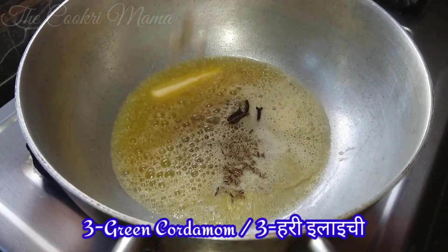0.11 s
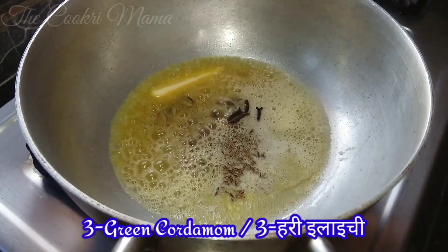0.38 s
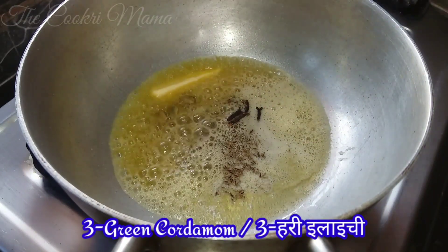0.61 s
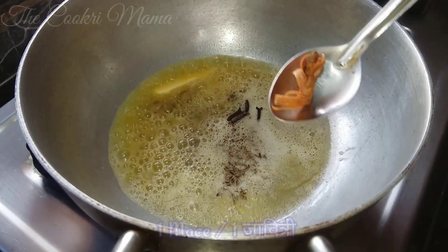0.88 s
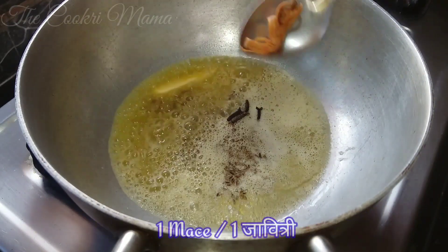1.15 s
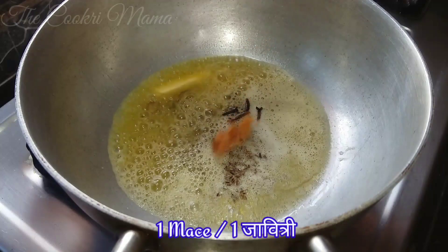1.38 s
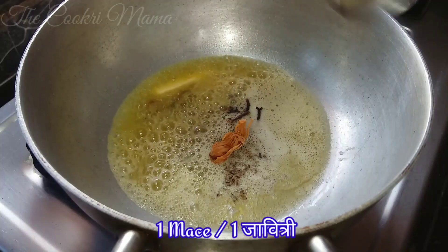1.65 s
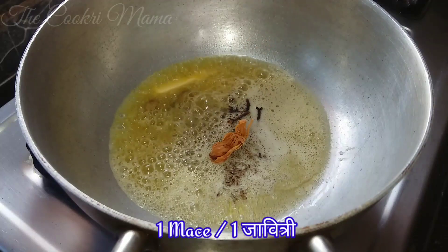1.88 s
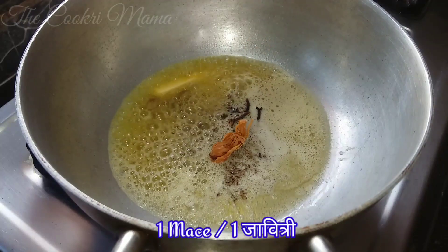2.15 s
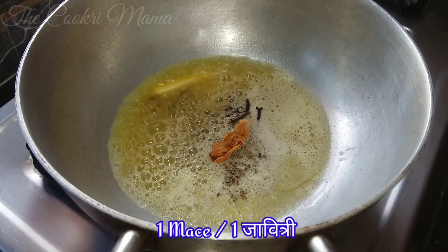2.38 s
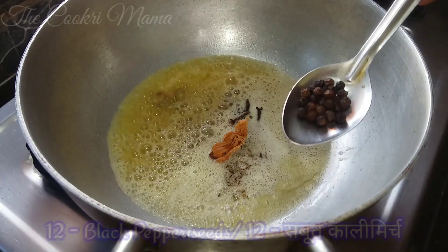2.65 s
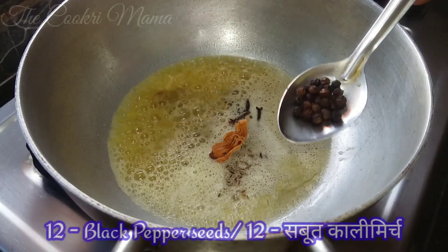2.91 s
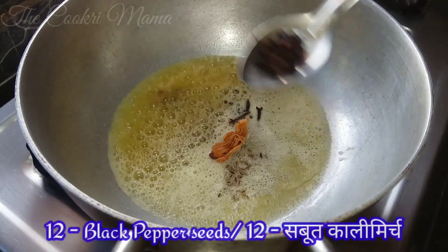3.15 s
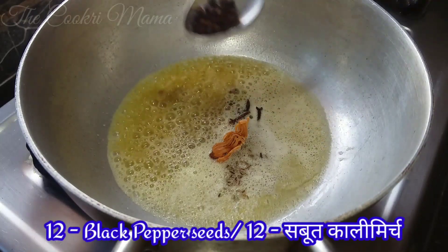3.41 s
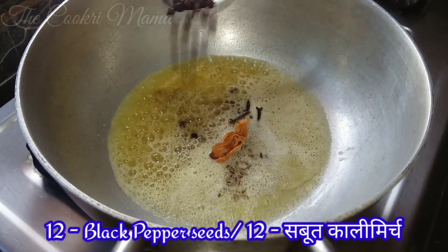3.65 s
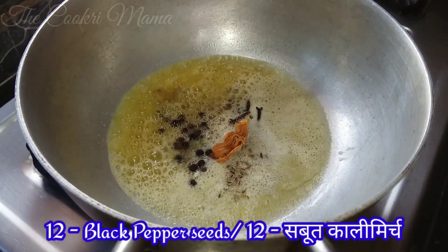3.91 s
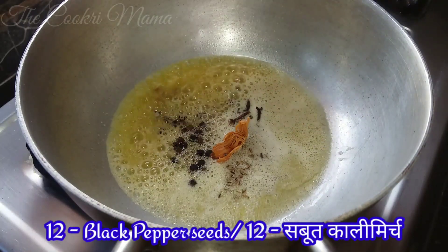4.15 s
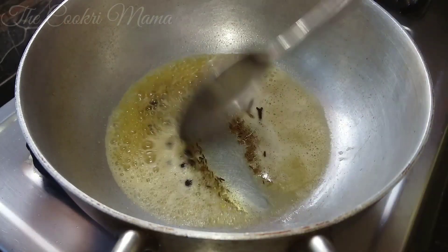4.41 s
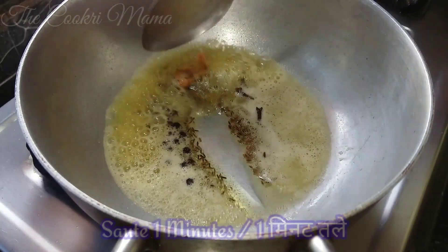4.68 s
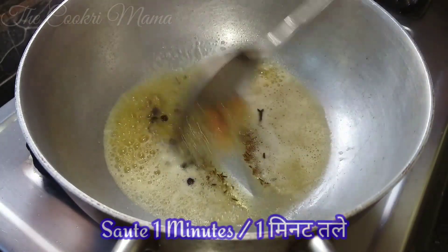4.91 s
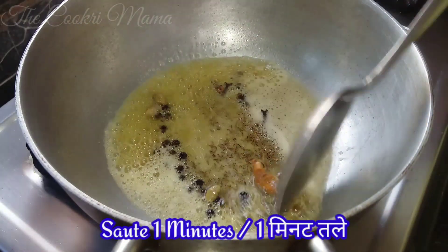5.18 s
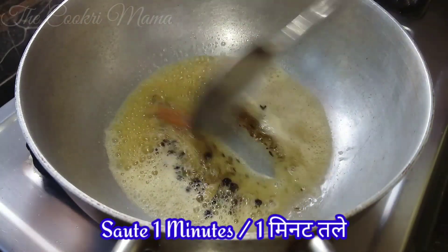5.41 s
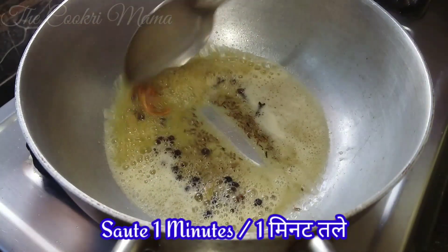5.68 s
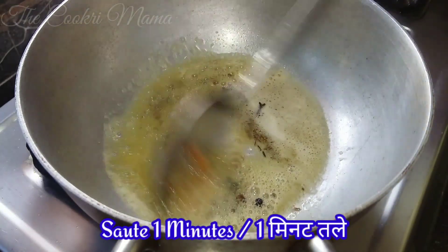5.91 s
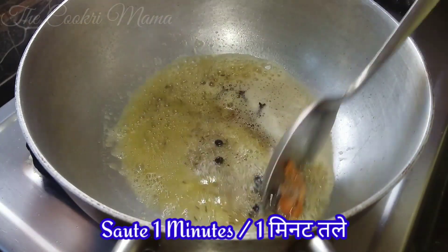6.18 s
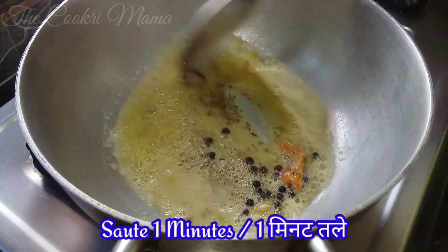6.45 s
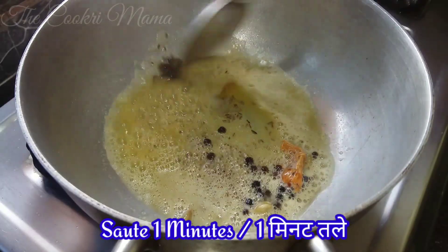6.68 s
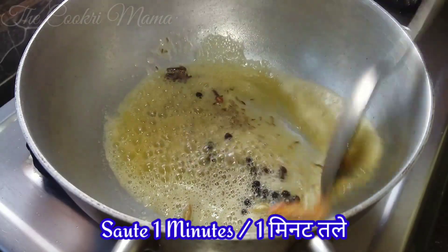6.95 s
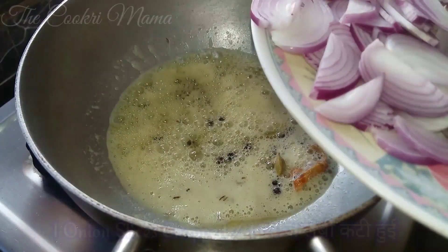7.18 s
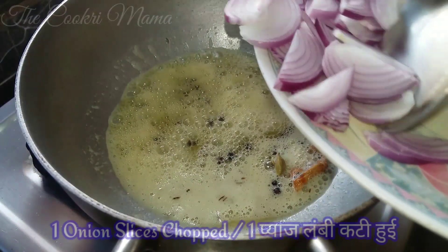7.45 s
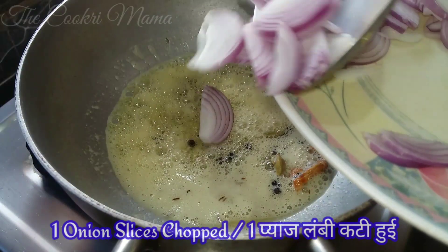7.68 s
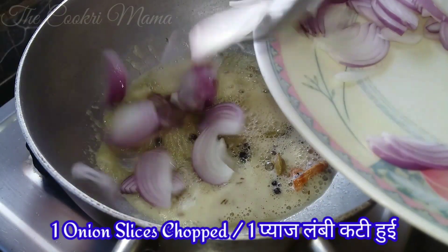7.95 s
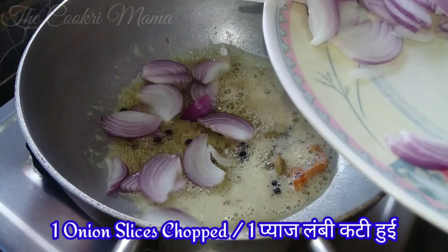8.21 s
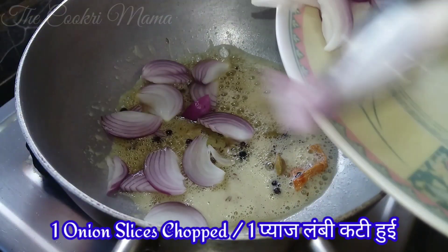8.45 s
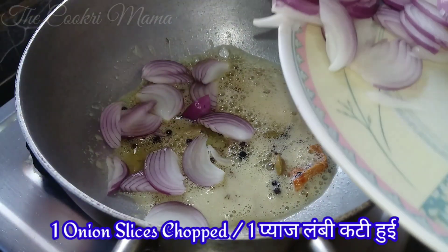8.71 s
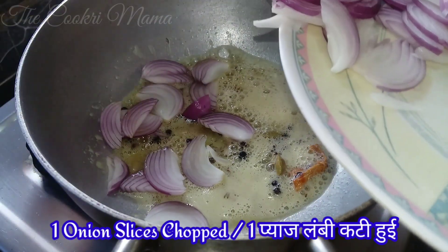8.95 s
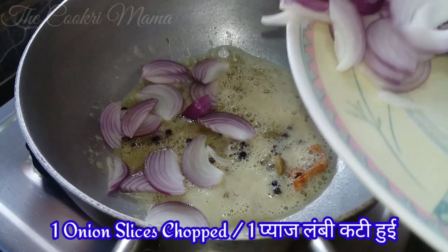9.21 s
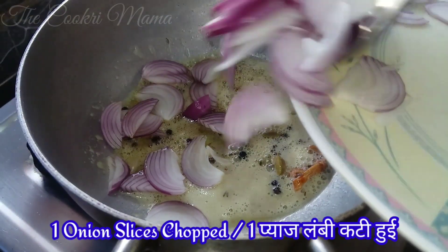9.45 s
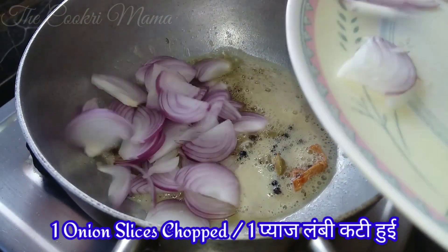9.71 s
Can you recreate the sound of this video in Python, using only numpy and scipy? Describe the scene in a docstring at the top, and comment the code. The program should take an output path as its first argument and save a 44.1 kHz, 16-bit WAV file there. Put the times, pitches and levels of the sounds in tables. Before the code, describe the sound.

Butter sizzles densely in a metal pan, a steel spoon knocks and scrapes, then the frying drops away and wet onion slices spit sharply.

```python
"""In a kitchen, butter foams and fries spices in a deep metal pan, close by and to the left of two microphones.
Bursting bubbles make the sizzle, and louder single bubbles the spits. A steel spoon stirs, and its knocks and
scrapes set the pan ringing. Near 7.3 s the frying drops abruptly to a much lower level; after that the spoon pushes
onion slices off a ringing plate, and they spit in the fat. Scraped edges sing as gliding tones. A motor hums in
steady lines, and filtered noise is the rumbling air."""
import sys
import numpy as np
from scipy import signal
from scipy.fft import rfft, irfft, next_fast_len
from scipy.io import wavfile

SR = 44100
rng = np.random.default_rng(int(sys.argv[2]) if len(sys.argv) > 2 else 0)


def wav_record(signal):
    """Record a signal, one row per channel, as 16-bit PCM in the file named by sys.argv[1]."""
    frames = np.transpose(np.atleast_2d(signal))
    bounded = np.clip(frames, -1, 1)
    # unit amplitude maps onto the largest positive 16-bit level
    quanta = np.round(bounded * 32767).astype(np.int16)
    wavfile.write(sys.argv[1], SR, quanta)


def voltage_ratio(level):
    """Linear amplitude factor for a level in decibels (scalar or array-like)."""
    return 10 ** (np.asarray(level, float) / 20)


N = 433944   # length [samples]
SIZE = next_fast_len(N + SR)   # transform length [samples], with room for filter tails
HZ = np.maximum(np.arange(SIZE // 2 + 1) * SR / SIZE, 1)   # frequency of each transform bin


def rms_one(x):
    """Scale to rms 1."""
    return x / np.sqrt(np.mean(x ** 2) + 1e-20)


def in_time(rows):
    """Read the columns of a time table at every sample."""
    s, *columns = np.transpose(rows)
    return [np.interp(np.arange(N) / SR, s, column) for column in columns]


def at_hz(points, hz):
    """Read a table of frequencies on a log-frequency axis."""
    table_hz, values = np.transpose(points)
    return np.interp(np.log(hz), np.log(table_hz), values)


def coloured(x, db):
    """Minimum-phase filter with the given dB per bin: nothing sounds before its cause."""
    cepstrum = irfft(db * np.log(10) / 20, SIZE)
    # folding the second half onto the first makes the filter act only forward in time
    cepstrum[..., 1:SIZE // 2] *= 2
    cepstrum[..., SIZE // 2 + 1:] = 0
    response = np.exp(rfft(cepstrum))
    return irfft(rfft(x, SIZE) * response, SIZE)[..., :N]


def drift(rate):
    """Smooth random wandering of spread 1: noise through two equal low-passes with corner rate [Hz]."""
    r = np.exp(-80 * np.pi * rate / SR)   # computed at every 40th sample only
    noise = rng.standard_normal(N // 40 + 2002)
    slow = signal.lfilter([1], [1, -2 * r, r * r], noise)[2000:]
    return np.interp(np.arange(N) / 40, np.arange(len(slow)), rms_one(slow - slow.mean()))


def ring(clicks, hz, t60):
    """A unit click sets a cosine of height 1 ringing, with no push of still air behind it."""
    r, w = voltage_ratio(-60 / (t60 * SR)), 2 * np.pi * hz / SR
    return signal.lfilter([.5, 0, -.5], [1, -2 * r * np.cos(w), r * r], clicks + 1e-18)


def ring_softly(force, hz, t60):
    """A blunt contact sets a sine of height 1 ringing: it starts from rest, without a bright click."""
    r, w = voltage_ratio(-60 / (t60 * SR)), 2 * np.pi * hz / SR
    return signal.lfilter([0, np.sin(w)], [1, -2 * r * np.cos(w), r * r], force + 1e-18)


def echo_tails(shape, t60, gap_s):
    """Diffuse reflections of unit energy: fading noise, different for each microphone and place."""
    t = np.arange(shape[-1]) / SR
    tail = rng.standard_normal(shape) * voltage_ratio(-60 * t / t60) * (t > gap_s)
    return tail / np.sqrt(np.sum(tail ** 2, axis=-1, keepdims=True))


def echoes(x, t60, gap_s):
    """One source thrown back to both microphones."""
    return signal.oaconvolve(x[None], echo_tails((2, SR // 2), t60, gap_s), axes=1)[:, :N]


def panned(db):
    """Left and right gains for a level difference, left minus right."""
    return voltage_ratio(np.array([db, -db]) / 2)


def sizzle():
    """Steam bubbles burst in clumps all over the pan and ring a few cycles, over the fine fizz of the foam."""
    # state of the fat: (time [s], extra gain of the top treble [dB], left minus right [dB],
    # bursts before clumping [per s])
    fat = [(0, 2, 1, 2140), (3.7, 1, 2, 2480), (4.76, 0.5, 0.5, 3300), (4.82, 3, 0.5, 3600),
           (5.4, 4, -0.5, 3500), (6.4, 5.5, 0.5, 5400), (7.31, 4.5, 0.5, 5500), (7.33, 4, 3, 500),
           (8.02, 5, -1, 710), (8.1, 12, 3.5, 2500), (8.5, 7.5, 0.5, 1000), (9.84, 8.5, 2.5, 1200)]
    # colouring filter of the frying: (frequency [Hz], gain [dB])
    sizzle_colour = [(400, -37), (600, -22), (900, -15), (1100, -19.5), (1430, -8.5), (1800, -10),
                     (2100, -6.5), (2700, -3.5), (3120, -1.5), (3400, 1), (3900, 1), (5000, 2.5),
                     (6400, -3.5), (8000, -11.5), (12000, -23.5), (15600, -29)]
    # left louder than right, before the shares given below: (frequency [Hz], difference [dB])
    shadow = [(500, 7), (1290, -2.5), (2400, 2.5), (3300, 4.5), (4400, 11), (5500, 12), (7000, 5),
              (15000, 7.5)]
    level_db = frying_db()
    treble_db, pan_db, per_s = in_time(fat)

    clumps = voltage_ratio(1.5 * drift(25.0) + 0.31 * drift(8.0) + 1.5 * drift(70.0))
    sizes = voltage_ratio(2.16 * np.minimum(rng.exponential(1, N), 5)) * rng.choice([-1, 1], N)
    born = sizes * (rng.random(N) < per_s * clumps / SR) / np.sqrt(per_s)

    # 36 places, each with its own bubble pitch and its own way round the bowl
    pitches, dealt = np.geomspace(600, 15000, 36), rng.integers(0, 36, N)
    paths = echo_tails((36, 2, 2048), t60=0.11, gap_s=0.00067) * voltage_ratio([[-5.0], [-1.5]])
    paths[:, 0, 0] += voltage_ratio(0.5)   # direct sound on the left
    # the right microphone is 6-10 samples further off
    paths[np.arange(36), 1, rng.integers(6, 11, 36)] += voltage_ratio(-7.5)
    bursts = np.zeros((2, N))
    for k, hz in enumerate(pitches):
        bubble = hz ** 0.7 * ring(paths[k], hz, 12.0 / hz)
        bursts += signal.oaconvolve((born * (dealt == k))[None], bubble, axes=1)[:, :N]

    tilt_db = 2.2 * np.log2(HZ / 5000)
    fizz = coloured(rng.standard_normal((2, N)), tilt_db) * clumps ** 0.039
    shade = at_hz(shadow, HZ)
    colour_db = at_hz(sizzle_colour, HZ) + np.array([0.25 * shade, -.7 * shade])
    both = rms_one(coloured(rms_one(bursts) + voltage_ratio(-2.0) * fizz, colour_db))
    top = signal.sosfilt(signal.butter(2, 7000, "high", fs=SR, output="sos"), both)
    top_gain = voltage_ratio(treble_db + 0.77 * drift(10.0))
    return voltage_ratio(level_db) * (both + (top_gain - 1) * top) * panned(pan_db)


def frying_db():
    """The slow level of the frying, wavering, with brief flares added as power."""
    # the frying swells as spices go in, drops abruptly near 7.3 s, and rises with the first onions:
    # (time [s], level before wavering and flares [dB])
    fry = [(0, -25), (0.1, -23), (0.28, -24), (0.7, -24), (1.07, -22.5), (1.4, -22), (2.44, -23),
           (2.58, -21.5), (3.6, -21), (4.5, -20.5), (5.1, -19.5), (5.55, -17.5), (5.8, -19), (6.44, -18.5),
           (7.285, -21), (7.32, -33), (7.327, -48.5), (8.06, -42), (8.11, -31), (8.45, -32.5),
           (8.55, -36.5), (9.84, -39.5)]
    # brief flares of the sizzle where wet onion meets the fat: (time [s], peak level [dB])
    flares = [(7.54, -47), (7.66, -49), (7.75, -36), (7.91, -38), (8.61, -29.5), (8.69, -36), (8.8, -37),
              (9.15, -34), (9.5, -42), (9.62, -34), (9.7, -49), (9.76, -29), (9.84, -30)]
    rise_db_per_s, fall_db_per_s = 404, 306
    t = np.arange(N) / SR
    power = voltage_ratio(2 * (in_time(fry)[0] - 0.31 * drift(0.56)))
    for s, db in flares:
        below_peak_db = np.maximum(rise_db_per_s * (s - t), fall_db_per_s * (t - s))
        power = power + voltage_ratio(2 * (db - below_peak_db))
    return 10 * np.log10(power)


def spits():
    """Each spit is a bubble ringing at its own pitch with a bright crack; the right microphone hears it later."""
    # spits of water in the fat, some loud and many quiet, before filtering and echoes: # (time [s], level [dB],
    # pitch [Hz], left minus right [dB])
    listed_spits = [(0.4085, -11, 4790, 13), (0.5302, -16, 4840, 8), (0.6659, -11, 3420, 12),
                    (0.9345, -9, 2540, 10), (0.9895, -11.5, 2600, 13), (1.1837, -19, 4560, 8),
                    (1.3029, -11, 4950, 8), (1.4182, -14, 5120, 6), (1.8642, -14, 5100, 20),
                    (2.0737, -14, 3530, 6), (2.1605, -12, 2860, 17), (2.7501, -21, 4550, 8),
                    (3.3682, -19, 5070, 6), (3.4301, -14, 3390, 10), (3.6137, -6, 4040, 12),
                    (3.6865, -13, 4850, 10.5), (4.4842, -19, 3320, 3), (5.0574, -9, 3550, 12),
                    (5.0948, -16, 4450, 6), (5.1307, -18, 4730, 5), (7.342, -31, 7500, 10),
                    (7.348, -31, 4500, 10), (7.368, -34, 8000, 10), (7.385, -36, 5000, 10),
                    (7.4032, -33, 4160, 11), (7.409, -29, 7000, 10), (7.4371, -30, 3640, 10),
                    (7.467, -33, 4500, 10), (7.4915, -27, 5000, 8), (7.5274, -26, 4240, 11),
                    (7.534, -26, 7200, 12), (7.5763, -34, 5200, 10), (7.6182, -33, 5000, 10),
                    (7.637, -31, 6000, 10), (7.6551, -30, 4700, 8), (7.6626, -28, 4900, 11),
                    (7.678, -31, 6000, 10), (7.706, -31, 8000, 10), (7.726, -13.5, 6600, 7),
                    (7.7843, -29, 5500, 11), (7.7982, -25, 4700, 10), (7.9459, -32, 5860, 10),
                    (8.0093, -24.5, 4260, 17), (8.0831, -28, 5770, 11), (8.103, -23, 5090, 12),
                    (8.152, -27, 6000, 7), (8.2233, -11.5, 6290, 12), (8.2542, -15, 4840, 14),
                    (8.2817, -10.5, 6210, 12), (8.2866, -15, 5000, 15), (8.3076, -20, 4840, 12),
                    (8.33, -20, 5020, 12), (8.3421, -15, 4300, 14), (8.354, -15, 5900, 14),
                    (8.365, -24, 4700, 10), (8.39, -10.5, 5000, 14), (8.405, -16, 4300, 10),
                    (8.4084, -17, 4950, 9), (8.4349, -18, 6060, 16), (8.4563, -19, 6380, 8),
                    (8.5414, -21, 6410, 10), (8.6371, -32, 4370, 8), (8.6701, -30, 4790, 10),
                    (8.6895, -19, 5810, 10), (8.6953, -15, 5850, 11), (8.7025, -18, 5800, 11),
                    (8.7382, -22, 6100, 13), (8.7853, -28, 7500, 8), (8.8325, -17, 6100, 8),
                    (8.8534, -21, 6300, 17), (8.8873, -22, 4900, 17), (8.9424, -23, 8500, 11),
                    (8.9741, -10, 6400, 10), (9.018, -23, 9500, 10), (9.0247, -21, 7000, 8),
                    (9.006, -29, 5000, 9), (9.08, -24, 4800, 8.5), (9.108, -20, 6600, 10),
                    (9.1465, -30, 4200, 10), (9.157, -16.5, 6400, 16), (9.1665, -18, 5600, 14),
                    (9.188, -23, 5600, 10), (9.2036, -18, 6450, 10), (9.342, -23, 8800, 11),
                    (9.3899, -32, 7500, 8), (9.4411, -25, 5990, 12), (9.4645, -25, 4700, 12),
                    (9.4745, -32, 4800, 12), (9.486, -18, 5000, 17), (9.503, -20, 6000, 14),
                    (9.5094, -19, 4960, 6), (9.5608, -33, 4940, 15), (9.578, -24, 4700, 13),
                    (9.6835, -17.5, 8300, 15), (9.697, -21, 6000, 8.5), (9.7095, -19, 4700, 12),
                    (9.7903, -18, 4950, 16), (9.8072, -13.5, 6000, 19), (9.824, -18, 5530, 11)]
    rise_s, cycles = 0.0004, 10   # the bubble fades by 60 dB in this many cycles
    crack_db, crack_spread_db, crack_t60_s = -14.5, 3, 0.0035
    out, t = np.zeros((2, N + 600)), np.arange(600) / SR
    rows = listed_spits + scattered_spits(count=16)

    crack_band = signal.butter(2, [5500, 11000], "band", fs=SR, output="sos")
    cracks = signal.sosfilt(crack_band, rng.standard_normal((len(rows), len(t))))
    strengths_db = crack_db + crack_spread_db * rng.standard_normal((len(rows), 1))
    crack_fade_db = -60 * np.abs(t - rise_s) / crack_t60_s
    cracks = cracks * voltage_ratio(strengths_db + crack_fade_db) * (t > rise_s / 2)

    for (s, db, hz, pan_db), crack in zip(rows, cracks):
        fade = voltage_ratio(-60 * np.maximum(t - rise_s, 0) * hz / cycles)
        bubble = np.sin(2 * np.pi * hz * t) * fade * np.minimum(t / rise_s, 1) ** 2
        band = signal.butter(2, [hz / 2, 12000], "band", fs=SR, output="sos")
        spit = signal.sosfilt(band, bubble) + crack
        start = round(s * SR)
        out[:, start:start + len(t)] += voltage_ratio(db) * spit * panned(pan_db)[:, None]
    out[1] = np.roll(out[1], 8)   # 8 samples later on the right
    near_echoes = echoes(out[0, :N], t60=0.014, gap_s=0.0012)
    return out[:, :N] + voltage_ratio([[-7.0], [-11.0]]) * near_echoes


def scattered_spits(count):
    """Further spits, rows like those listed, scattered in time, strength, pitch and place once onions lie in
    the fat."""
    onions_in_s = 7.5
    when, spread = rng.random(count), rng.standard_normal((count, 3))
    times = onions_in_s + when * (N / SR - onions_in_s)
    levels_db = -30 + 5 * spread[:, 0]
    pitches = 5900 * 2 ** (0.41 * spread[:, 1])
    pans_db = 18 + 4 * spread[:, 2]
    return list(zip(times, levels_db, pitches, pans_db))


def spoon_on_pan():
    """The steel spoon knocks and strokes the pan, whose wall rings in its own modes."""
    # knocks, before the common knock trim: (time [s], level [dB], spot pitch [Hz],
    # fall-off above it [dB per octave], left minus right [dB])
    pan_knocks = [(0.32, -25, 945, 13, -2), (1.508, -27, 935, 20, -1), (3.859, -28, 910, 16, -3),
                  (4.552, -23, 973, 17, -2), (4.755, -23, 2060, 6.1, 5), (4.776, -21, 2050, 10, 3),
                  (4.952, -15, 560, 7, 3), (4.983, -18.5, 920, 3, 0.0), (4.984, -27, 1550, 30, 2),
                  (5.011, -18, 910, 20, -4), (5.049, -21, 910, 16, -7), (5.396, -17, 573, 5, -3),
                  (5.398, -27, 2000, 20, 3), (5.575, -20, 855, 9, -0.5), (6.287, -18, 517, 7, 0),
                  (6.288, -10.5, 810, 4, 1), (6.288, -15, 1310, 6, -3), (6.289, -22, 2000, 20, -6),
                  (6.762, -31, 1420, 21, -2), (6.953, -16, 1700, 25, 8), (6.955, -15.5, 940, 24, 5),
                  (7.083, -20.5, 800, 8, -4), (7.0829, -21, 1400, 20, 2), (7.0835, -10, 2010, 18, 7)]
    # strokes, before the common drag trim: (start [s], length [s], level [dB], spot pitch [Hz],
    # fall-off above it [dB per octave])
    stir = [(4.486, 0.21, -39, 1110, 9), (4.647, 0.4, -40.5, 1450, -6), (4.978, 0.19, -42, 900, 17),
            (5.38, 0.34, -32.5, 1120, 31), (5.59, 0.17, -38, 1400, -1), (5.708, 0.44, -42.5, 1420, 4),
            (6.28, .05, -41, 1310, 12), (6.369, 0.18, -35.5, 1060, 28), (6.563, 0.18, -37.5, 1160, 33),
            (6.749, 0.23, -29.5, 403, 2.5), (6.903, 0.18, -31, 930, 22), (7.096, 0.18, -26, 437, 7.5)]
    # modes of the pan, before the random strength of each knock and the damping of a drag:
    # (frequency [Hz], level [dB], time to fade by 60 dB [s])
    pan_modes = [(340, -52, 0.15), (402, -42, 0.055), (525, -9, 0.03), (644, -21, 0.019),
                 (810, -3.5, 0.055), (879, -4, 0.14), (948, -5.5, 0.13), (1090, -10.5, 0.038),
                 (1418, 4.5, 0.029), (1510, -6, 0.023), (1740, 4, 0.027), (2004, 0, 0.036),
                 (2030, -3, 0.17), (3080, -27, 0.24)]
    return spoon_on(pan_modes, pan_knocks, stir, attack_s=0.0092, release_share=0.2, pressure_db=2.5,
                    slips_per_s=860.0, knock_db=-7.5, clank_db=-10.5, clank_cycles=17.0, contact_s=0.0082,
                    drag_db=-26.0, drag_pan_db=0.0, thud_db=-24.5, below_db=18, spot_db=-1.8)


def spoon_on_plate():
    """Spoon and sliding onion slices knock and rub the plate, which rings in its own modes."""
    # spoon knocks and slices landing, before the common knock trim: (time [s], level [dB],
    # spot pitch [Hz], fall-off above it [dB per octave], left minus right [dB])
    plate_knocks = [(7.735, -10.5, 3030, 6, 6), (7.735, -26, 544, -2, -4), (7.794, -32, 586, 6, 6),
                    (7.99, -20.5, 850, 9, 7), (8.056, -33, 520, 4, 6), (8.108, -30, 365, 11, 4),
                    (8.416, -18, 590, 3, -9), (8.416, -15.5, 1435, 8, -10), (8.416, -15.5, 4800, 15, 7),
                    (8.436, -30, 620, 14, -3), (8.457, -26, 258, 5, -5.0), (8.586, -24, 315, 2, -10),
                    (8.5867, -18.5, 4300, -15, 9), (8.596, -14.5, 4760, -8, 2), (8.607, -29, 4760, 2, 5),
                    (8.617, -35, 3050, 6, 3), (9.1073, -13, 440, 2.5, -7.5), (9.111, -33, 3310, 20, 8),
                    (9.231, -27.5, 439, 6, -4), (9.245, -33, 430, -2.5, -8), (9.267, -27, 1100, 2, -6),
                    (9.275, -28.5, 1690, 5, 14), (9.287, -27, 1110, -1, 0), (9.294, -41, 696, -5, 0),
                    (9.315, -30, 1100, 2, 0), (9.616, -19, 4300, 8, -1), (9.617, -20.5, 484, 0.5, 4),
                    (9.712, -35, 840, -1, -1), (9.749, -30, 877, 14, 4)]
    # strokes of the spoon and sliding slices, before the common drag trim: (start [s], length [s],
    # level [dB], spot pitch [Hz], fall-off above it [dB per octave])
    push = [(7.476, 0.093, -38, 1700, 11), (7.735, 0.04, -36, 570, 12), (7.784, 0.022, -33, 585, 4),
            (7.852, 0.054, -29, 900, 7), (7.901, 0.02, -30, 2300, 2), (8.005, 0.029, -37.5, 725, 3),
            (8.043, 0.09, -28.5, 524, 16), (8.406, 0.026, -16, 575, 12), (8.451, 0.029, -34, 661, -1),
            (8.598, 0.031, -30.5, 664, 2), (9.104, 0.025, -29, 451, 6), (9.14, 0.078, -35.5, 400, 2),
            (9.217, 0.032, -31, 600, 2.5), (9.25, 0.08, -31, 1000, 0), (9.625, 0.045, -26.5, 950, 4),
            (9.742, 0.032, -34, 772, 4), (9.815, .03, -36, 740, 5)]
    # modes of the plate, before the random strength of each knock and the damping of a drag:
    # (frequency [Hz], level [dB], time to fade by 60 dB [s])
    plate_modes = [(196, -5, 0.079), (268, -4, 0.017), (348, -4.5, 0.042), (421, -10.5, 0.1),
                   (516, -4.5, 0.055), (696, 5, 0.019), (930, -4.5, 0.041), (1100, -3.5, 0.029),
                   (1440, 1, 0.018), (1720, -4, 0.052), (1916, -9, 0.056), (2350, 1, 0.017),
                   (3004, -8, 0.13), (3310, -4, 0.04), (4300, -12, 0.022), (4800, -19, 0.036),
                   (6040, -15, 0.04), (6600, -12, 0.025), (8000, -19.5, 0.041)]
    return spoon_on(plate_modes, plate_knocks, push, attack_s=0.0092, release_share=0.32, pressure_db=2.5,
                    slips_per_s=1400.0, knock_db=-6.0, clank_db=-9.5, clank_cycles=13.0, contact_s=0.012,
                    drag_db=-28.5, drag_pan_db=-4.5, thud_db=-15.0, below_db=10.0, spot_db=10)


def spoon_on(modes, knocks, strokes, attack_s, release_share, pressure_db, slips_per_s, knock_db, clank_db,
             clank_cycles, contact_s, drag_db, drag_pan_db, thud_db, below_db, spot_db):
    """Knocks and the dense uneven slips of a drag excite the same modes, most those near the touched spot's pitch."""
    drag_t60_s = 0.035   # the spoon lying on the wall damps its ring
    rows, out = np.array(knocks), np.zeros((2, N))
    at = np.round(rows[:, 0] * SR).astype(int)

    level, spot_hz, above_db = np.zeros(N), np.full(N, 1000.), np.zeros(N)
    for start_s, length_s, db, hz, fall_db in strokes:
        i, _, gain = stroke_shape(start_s, length_s, attack_s, release_share)
        level[i], spot_hz[i], above_db[i] = voltage_ratio(db) * gain, hz, fall_db
    slip_sizes = voltage_ratio(1.0 * rng.exponential(1, N)) * rng.choice([-1, 1], N)
    slips = rms_one((rng.random(N) < slips_per_s / SR) * slip_sizes)
    pressure = voltage_ratio(drag_db + pressure_db * drift(6.2))
    slips = slips * level * pressure * panned(drag_pan_db)[:, None]

    # a spot pushes some modes out and others in, those at its own pitch always out
    strengths_db = rng.normal(0, 2, (len(rows), len(modes)))
    signs = rng.choice([-1, 1], strengths_db.shape)
    for (hz, db, t60), own_db, sign in zip(modes, strengths_db.T, signs.T):
        octaves, knock_octaves = np.log2(hz / spot_hz), np.log2(hz / rows[:, 2])
        drag = slips * voltage_ratio(np.where(octaves > 0, -above_db, below_db) * octaves)
        reach_db = np.where(knock_octaves > 0, -rows[:, 3], below_db) * knock_octaves
        reach_db = reach_db + spot_db * (abs(knock_octaves) < 1 / 12)
        push_sign = np.where(abs(knock_octaves) < 1 / 6, 1, sign)
        force = np.zeros((2, N))
        force[:, at] += push_sign * voltage_ratio(rows[:, 1] + knock_db + reach_db + own_db) * panned(rows[:, 4])
        out += voltage_ratio(db) * (ring_softly(force, hz, t60) + ring_softly(drag, hz, min(t60, drag_t60_s)))
        # the contact itself: a dry thud in the same range
        out += voltage_ratio(db + thud_db) * ring_softly(force + drag, hz, 10.0 / hz)

    # while spoon and wall touch, the spot clanks at its pitch
    for i, (s, db, hz, _, pan_db) in zip(at, knocks):
        cycles = min(clank_cycles, contact_s * hz)
        turns = np.arange(int(cycles * SR / hz)) * hz / SR
        clank = np.sin(2 * np.pi * turns) * np.sin(np.pi * np.sqrt(turns / cycles))
        out[:, i:i + len(turns)] += voltage_ratio(db + clank_db) * clank * panned(pan_db)[:, None]
    return signal.sosfilt(signal.butter(3, [170, 9000], "band", fs=SR, output="sos"), out)


def singing():
    """The dragged edge sticks and slips in step with the wall: a near sine that glides and wavers."""
    # strokes on which pan or plate sings, before wavering:
    # (start [s], length [s], first pitch [Hz], last pitch [Hz], level [dB])
    song = [(4.95, 0.15, 313, 326, -43.5), (5.013, 0.059, 907, 880, -28), (5.394, 0.035, 889, 867, -27.5),
            (5.491, 0.055, 930, 1090, -36), (5.553, 0.051, 878, 883, -28), (6.891, 0.037, 930, 960, -30),
            (6.934, 0.12, 949, 875, -27), (6.882, 0.032, 1700, 1720, -34), (6.926, 0.056, 1734, 1740, -28),
            (7.092, 0.099, 2047, 2010, -33), (7.15, 0.13, 912, 948, -32.5), (9.258, 0.083, 2960, 3250, -41),
            (9.642, 0.029, 4300, 4320, -38)]
    out = np.zeros(N)
    waver, wobble = voltage_ratio(3.0 * drift(70.0)), 1 + 0.012 * drift(34.0)   # of level and of pitch
    for start_s, length_s, first_hz, last_hz, db in song:
        i, along, gain = stroke_shape(start_s, length_s, attack_s=0.011, release_share=0.51)
        hz = (first_hz + (last_hz - first_hz) * along) * wobble[i]
        out[i] += voltage_ratio(db) * gain * waver[i] * np.sin(2 * np.pi * np.cumsum(hz) / SR)
    return out


def stroke_shape(start_s, length_s, attack_s, release_share):
    """Samples covered by a stroke, progress 0-1 along it, and its gain: attack, hold, release."""
    i = np.arange(round(start_s * SR), min(round((start_s + length_s) * SR), N))
    along = (i / SR - start_s) / length_s
    gain = np.minimum(along * length_s / attack_s, (1 - along) / release_share)
    return i, along, np.clip(gain, 0, 1)


def kitchen_echo(spoon):
    """The kitchen throws the spoon's sound back, partly different at each microphone."""
    kitchen = echoes(spoon.mean(axis=0), t60=0.23, gap_s=0.0023)
    middle = kitchen.mean(axis=0)
    return voltage_ratio(-6.0) * (middle + 0.81 * (kitchen - middle))   # 0.81: share kept of what differs


def background():
    """A motor's wavering lines over broad kitchen air, less alike in the two microphones towards the treble."""
    # lines of the motor, relative to the hum level: (frequency [Hz], level [dB], waver [dB])
    hum_lines = [(88.1, 1.2, 1.5), (142.2, -6.5, 2.5), (175, -13, -0.5), (262.3, -15.5, 1.5)]
    # the hum wavers, and is louder from about 7.2 s on: (time [s], level [dB])
    hum_level = [(0, -50), (0.3, -49.5), (2.08, -47.5), (2.46, -49), (2.68, -45), (3.2, -54.5), (3.53, -46),
                 (3.85, -51.5), (4.3, -45), (4.5, -51), (4.77, -45.5), (5.23, -52), (5.64, -47),
                 (7.04, -49), (7.23, -39), (7.7, -34.5), (8.2, -38), (9.84, -38.5)]
    # colour of the air, before scaling to the air level: (frequency [Hz], relative level [dB per Hz])
    air_colour = [(15, -40), (25, -10), (60, -5.5), (97, 7.5), (164, 5.5), (221, -0.5), (300, 0), (374, -1),
                  (439, 4.5), (779, 2), (1180, -4), (2140, -6), (4060, -16), (6000, -89.5), (7800, -57),
                  (13200, -120)]
    # left-right likeness of the air, where below 0 counts as 0: (frequency [Hz], likeness [1 = same])
    air_likeness = [(30, 0.7), (60, 0.95), (180, 0.72), (550, 0.67), (1650, -0.23), (4970, -0.93),
                    (15000, -0.0)]
    # kitchen air before a slight waver: (time [s], level [dB])
    air_level = [(0, -48), (7.1, -48), (7.25, -44), (9.84, -42)]
    (hum_db,), (air_db,) = in_time(hum_level), in_time(air_level)
    t = np.arange(N) / SR
    hum = np.zeros(N)
    for hz, db, waver_db in hum_lines:
        strength = voltage_ratio(db + waver_db * drift(7.3))
        phase = .5 * drift(6.9) + rng.uniform(0, 5.46)
        hum += strength * np.sin(2 * np.pi * hz * t + phase)

    alike = np.clip(at_hz(air_likeness, HZ), 0, 1)
    mid, side = rfft(rng.standard_normal((2, SIZE))) * voltage_ratio(at_hz(air_colour, HZ))
    air = irfft(np.sqrt(1 + alike) * mid + np.sqrt(1 - alike) * side * [[1], [-1]], SIZE)[:, :N]
    return voltage_ratio(hum_db) * hum + voltage_ratio(air_db + 0.23 * drift(0.31)) * rms_one(air)


def scene():
    """Fat, spoon with its kitchen echoes, and background."""
    spoon = spoon_on_pan() + spoon_on_plate() + singing()
    return sizzle() + spits() + spoon + kitchen_echo(spoon) + background()


def band_limit(x):
    """A steep low-pass at the top of the band."""
    return signal.sosfilt(signal.butter(12, 15500, fs=SR, output="sos"), x)


def record(dry):
    """Finish the mix: a tanh curve rounds the peaks softly."""
    rounded = 1.228 * np.tanh(dry / 1.203)
    return band_limit(rounded)


dry = scene()
out = record(dry)
wav_record(out)
```